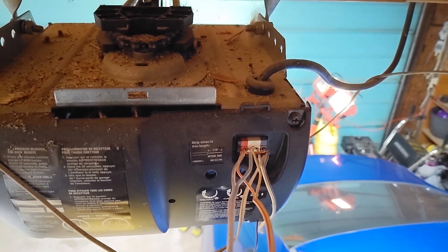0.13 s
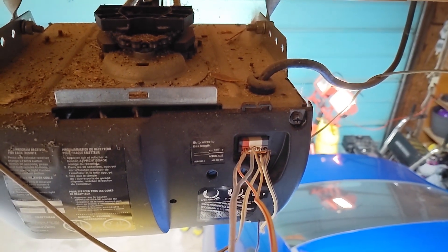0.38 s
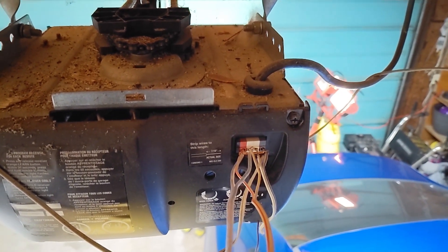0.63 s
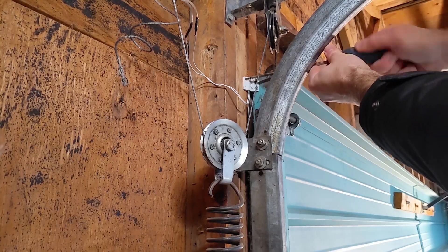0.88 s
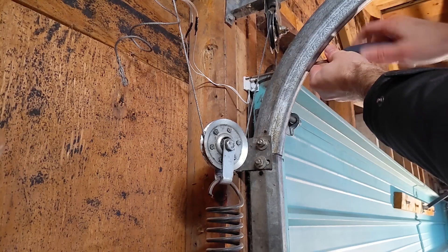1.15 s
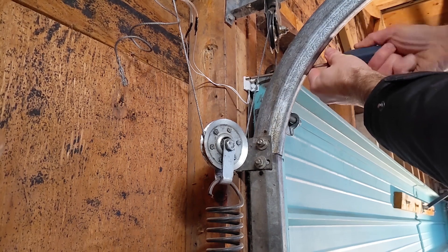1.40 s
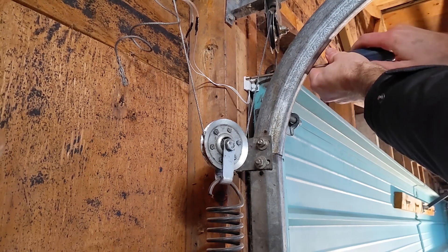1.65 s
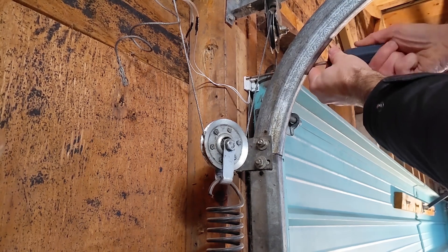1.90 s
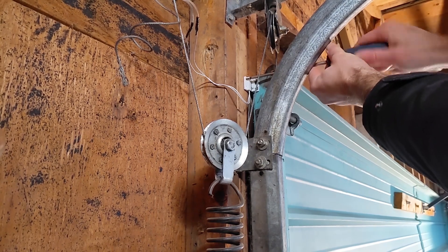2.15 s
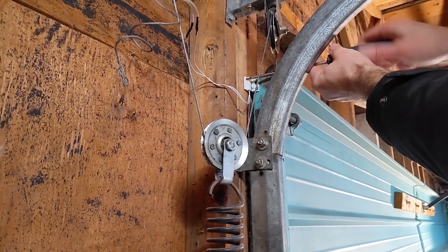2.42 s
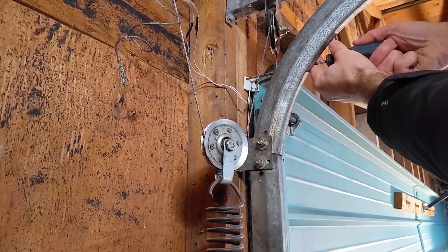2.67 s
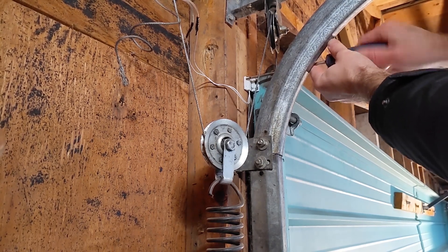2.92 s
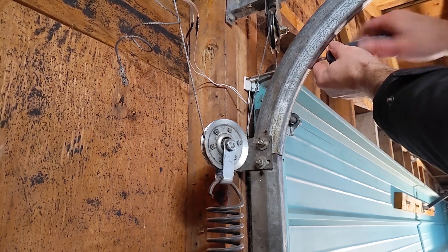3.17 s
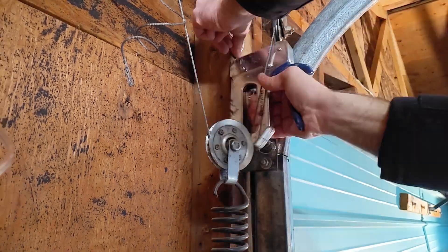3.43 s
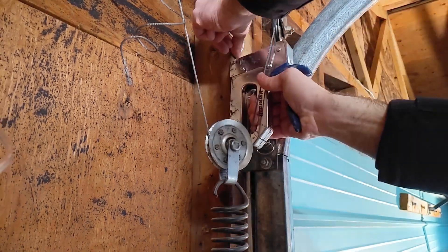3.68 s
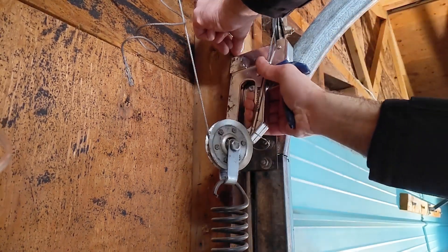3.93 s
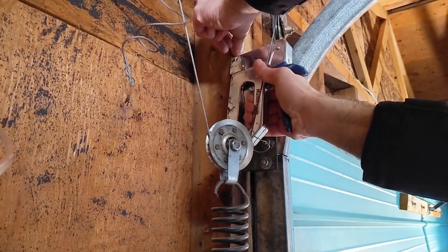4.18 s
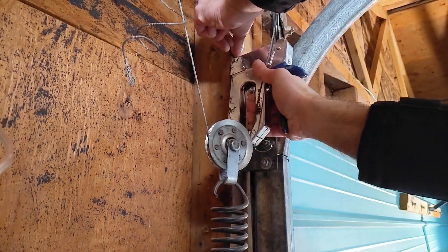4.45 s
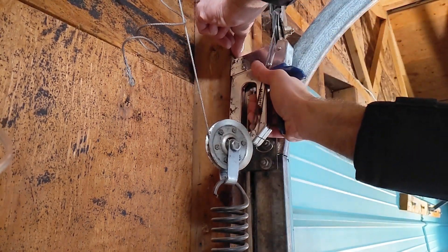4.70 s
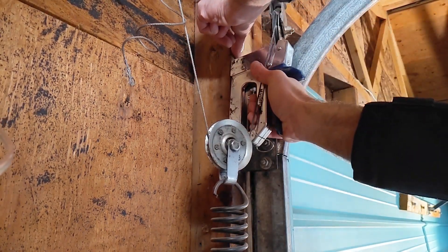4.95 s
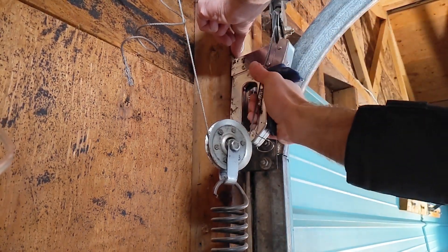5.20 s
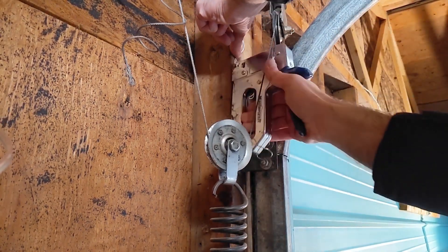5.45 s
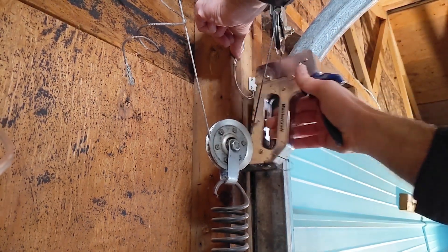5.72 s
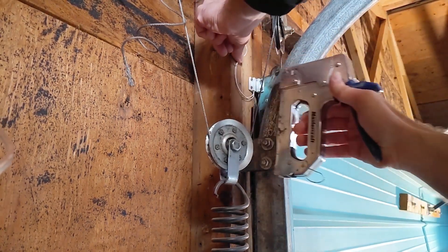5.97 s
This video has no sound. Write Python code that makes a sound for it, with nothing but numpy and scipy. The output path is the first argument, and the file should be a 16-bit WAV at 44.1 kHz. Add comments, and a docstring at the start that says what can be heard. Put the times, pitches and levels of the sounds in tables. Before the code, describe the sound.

A wooden garage, close stereo microphone, very quiet air. At 0 s an earlier bump dies quickly over faint low rumble; a small tick comes near 0.6. From 0.7 to 3.5 s hands turn a screwdriver: soft sleeve swishes about every fifth of a second, dull rubs, a click with a woody tap at 0.97, thin high squeaks around 1.4, another tick and tiny chirp near 1.8, with a faint outside drone beneath. At 3.4-3.5 light clicks and bumps mark the change. The staple gun rubs and taps the board around 3.9, clicks harder at 4.12, then rubs quietly. Squeezing gives a knock at 4.84 and steel clicks at 4.9 and 5.0. At 5.14 it fires: a loud, dry, bright crack with hissing tail and low wall boom. Boomy clatter follows at 5.4-5.6, heavy clacks at 5.59 and 5.7, then weaker knocks fading by 6 s.

```python
"""A steel staple gun in a wooden garage is set on a board, squeezed, fired and lifted off with clacks and knocks.
Before it, hands turn a screwdriver; the screw squeaks and sleeves rustle close to a two-port microphone.
Rattling contacts ring steel and board modes, and sparse reflections return from the room.
Shaped noise makes cloth, the shot's hissing treble tail, rubs, wall boom, a faint drone and air;
a wandering sine swings the frame."""
import sys
import numpy as np
from scipy import signal
from scipy.fft import rfft, irfft
from scipy.io import wavfile
from scipy.ndimage import uniform_filter1d

SR = 44100
rng = np.random.default_rng(int(sys.argv[2]) if len(sys.argv) > 2 else 0)


def pcm_store(signal):
    """Save signal as 16-bit PCM."""
    levels = np.round(np.clip(np.atleast_2d(signal), -1, 1) * 32767)
    wavfile.write(sys.argv[1], SR, levels.astype(np.int16).T)


def rack_gain(trim_db):
    """Turn a fader trim in dB into the linear factor to multiply a signal by."""
    fader = np.asarray(trim_db, float)
    return 10 ** (fader / 20)


N = 268701
RING = 4096  # samples a blow lasts

# Modes of the steel parts. Each row: pitch in Hz, relative level in dB, t60 in seconds.
STEEL = [(1335, -4, .03), (2000, -5, .03), (2330, -3, .05), (2900, -4, .03), (3500, -5, .03),
         (4400, -5, .02), (5500, -6, .015), (6510, -4, .015), (8350, -7, .012), (10080, -9, .012),
         (11700, -5, .012)]
# Likeness of left and right in diffuse sound. Each row: frequency in Hz, likeness from 0 to 1.
SAME = [(60, 0.89), (130, 0.94), (300, 0.45), (650, 0.11), (1400, 0.03), (15000, 0)]
# Cuts between three stretches of work. One row: times in seconds.
CUTS = (.717, 3.495)


def evened(x):
    """Scales a sound to rms 1."""
    return x / np.sqrt(np.mean(x ** 2) + 1e-20)


def read(points, hz):
    """Reads a table on a log-frequency axis."""
    f, value = np.transpose(points)
    return np.interp(np.log(hz + 1), np.log(f + 1), value)


def stretch(index):
    """1 during one stretch of work, 0 outside."""
    return 1. * (np.searchsorted(CUTS, np.arange(N) / SR) == index)


def swells(peaks, rise_db_s):
    """Gain from rows (peak s, dB, fade dB per s): straight rise and fade in dB, powers added."""
    t = np.arange(0, N + 64, 64) / SR
    power = 0
    for s, db, fade in peaks:
        drop_db = np.where(t < s, rise_db_s * (s - t), fade * (t - s))
        power = power + rack_gain(db - drop_db) ** 2
    return np.interp(np.arange(N) / SR, t, np.sqrt(power))


def fading_gain(start_db, fade_db_s):
    """Gain that falls steadily in dB from the first sample."""
    return rack_gain(start_db - fade_db_s * np.arange(N) / SR)


def slow_drift(size):
    """Smooth random drift of rms 1, from noise averaged twice over size samples."""
    once = uniform_filter1d(rng.standard_normal(N), size)
    return evened(uniform_filter1d(once, size))


def noise(points, patchy_db, size):
    """Stereo noise of a spectrum in dB per Hz, with drifting patches, alike in the bass; rms 1."""
    hz = np.fft.rfftfreq(size, 1 / SR)
    a, b, c, d, patches = rng.standard_normal((N * 4 // size + 5, len(hz), 5)).T
    patches = uniform_filter1d(patches, size // 64, axis=0)  # over frequency
    patches = evened(uniform_filter1d(patches, 8192 // size, axis=1))  # over time
    same = read(SAME, hz)[:, None]
    left, other = a + 1j * b, c + 1j * d
    z = np.array([left, same * left + np.sqrt(1 - same ** 2) * other])
    z *= rack_gain(read(points, hz)[:, None] + patchy_db * patches)
    return evened(signal.istft(z, nperseg=size, noverlap=size * 3 // 4)[1][:, :N])


def resonance(hz, width):
    """Response of one resonance of about unit gain on the bins of a blow; width in Hz."""
    back = np.exp(-2j * np.pi * np.arange(RING // 2 + 1) / RING)
    pole = np.exp((2j * np.pi * hz - np.pi * width) / SR)
    return (1 - abs(pole)) * (1 / (1 - pole * back) + 1 / (1 - np.conj(pole) * back))


def rattle(length):
    """Spectra of a short chatter of contacts, as the left and right ports hear it close by."""
    # Likeness of left and right in close sound. Each row: frequency in Hz, likeness from 0 to 1.
    near_same = [(100, .98), (400, 1), (1000, 0.46), (3000, 0), (15000, 0)]
    port_lag_s = 0.000197  # the left port hears the work a little earlier
    t, bins = np.arange(RING) / SR, np.fft.rfftfreq(RING, 1 / SR)
    uneven = rack_gain(2.0 * uniform_filter1d(rng.standard_normal(RING), 12))
    envelope = (1 - np.exp(-t / (0.071 * length))) ** 2 * np.exp(-t / length)
    left, other = rfft(rng.standard_normal((2, RING)) * uneven * envelope)
    same = read(near_same, bins)
    right = same * left + np.sqrt(1 - same ** 2) * other
    return left, right * np.exp(-2j * np.pi * bins * port_lag_s)


def struck_colour(hz, treble_db, modes, ring_db, edge_hz, top_hz, q):
    """Colour of a blow: its main ring, the object's modes and a bright crack."""
    bins = np.fft.rfftfreq(RING, 1 / SR)
    main = resonance(hz, hz / q) ** 2
    rings = 0
    for f, mode_db, t60 in modes:
        spot_db = 2.5 * rng.standard_normal()  # the spot struck favours some modes
        # modes near the main ring are struck hardest
        gain = rack_gain(mode_db - 11.5 * abs(np.log2(f / hz)) + spot_db)
        rings = rings + gain * resonance(f, np.log(1000) / np.pi / t60) * np.sqrt(t60)
    # a low top_hz dulls the crack, as soft wood does
    crack = (1j * bins / (edge_hz + 1j * bins)) ** 3 / (1 + 1j * bins / top_hz) ** 2
    parts = ((main, 0), (rings, ring_db), (crack, treble_db + 4.5))
    return sum(rack_gain(db) * part / np.linalg.norm(part) for part, db in parts)


def struck(rows, modes, ring_db, edge_hz, top_hz, q, left_db):
    """All blows of one kind: left, right, and as sent into the room with a smooth colour."""
    out = np.zeros((3, N + RING))
    for s, db, hz, treble_db, length, room_db in rows:
        length = max(length, .0005)
        left, right = rattle(length)
        colour = struck_colour(hz, treble_db, modes, ring_db, edge_hz, top_hz, q)
        # the room hears the blow from all sides, so no chatter roughens its colour
        sound = np.array([evened(irfft(colour * drive)) for drive in (left, right, 1)])
        feeds_db = np.array([[left_db / 2], [-left_db / 2], [room_db]])
        # energy = peak squared x rattle length, with the rms 8 dB under the nominal peak
        sound *= rack_gain(db - 8.0 + feeds_db) * np.sqrt(length * SR / RING)
        at = round(s * SR)
        out[:, at:at + RING] += sound
    return out[:, :N]


def rattling(rows, rattle_s):
    """Gives each blow its rattle length, rattle_s at -30 dB: harder blows chatter longer."""
    doubling_db = 70  # a blow this much harder chatters twice as long
    return [(s, db, hz, treble_db, rattle_s * 2 ** ((db + 30) / doubling_db), room_db)
            for s, db, hz, treble_db, room_db in rows]


def staple_shot():
    """The spring drives the staple home: a burst of short, bright steel blows."""
    # Each row: start in seconds, nominal peak in dB, main ring in Hz,
    # relative treble in dB, room feed in dB.
    shot_blows = [(5.1375, -13, 3000, 1, -11), (5.1408, 1.5, 5050, -6, 0), (5.1445, -9, 3000, 4.5, -1),
                  (5.149, -11, 4600, -6, -4), (5.156, -18, 3500, -7, -8)]
    return struck(rattling(shot_blows, 0.0018), STEEL,
                  ring_db=-16, edge_hz=4700, top_hz=29800, q=0.71, left_db=0.0)


def steel_clicks():
    """Steel parts click as short contacts ring the steel modes."""
    # Each row: start in seconds, nominal peak in dB, main ring in Hz,
    # relative treble in dB, room feed in dB.
    click_blows = [(.587, -52, 2680, -14, -8), (.972, -31, 2880, -11, -7.5), (.979, -31.5, 2300, -18, -16),
                   (1.057, -41, 9300, 17, -13), (1.846, -32.5, 2140, 21, -7), (2.218, -48, 2150, -13, -3),
                   (2.318, -46.5, 1900, -15, -20), (2.624, -41.5, 2430, 0, -3),
                   (3.09, -49, 1980, -21, -0.5), (3.357, -38, 7100, 8, -9), (3.396, -33.5, 2060, -1, -9),
                   (3.408, -48, 3000, 3, 5), (3.419, -51, 2270, 0, 3), (3.497, -25.5, 8800, -10, -5),
                   (3.499, -25, 2560, -1.5, -6), (3.742, -53, 5900, -11, -25), (3.765, -55, 5000, -10, -17),
                   (3.861, -46, 2120, -20, -8), (3.89, -44.5, 4450, -1, -14), (3.921, -39.5, 4700, 7, -18),
                   (3.93, -37.5, 1950, -20, -7), (3.998, -54, 4500, -3, 1), (4.124, -21, 6400, 5.5, -6.5),
                   (4.135, -25.5, 1760, -7, -7), (4.15, -36, 1830, -15, -19), (4.697, -38, 2190, 5, -6),
                   (4.907, -16.5, 6730, -2, -15), (5.008, -10, 4500, -20, -12.5),
                   (5.372, -27.5, 10100, -14, -10), (5.41, -39, 12000, -2, -18),
                   (5.455, -40, 12000, 2, -15), (5.477, -32.5, 2940, -4, -4), (5.488, -29.5, 9500, -2, -19),
                   (5.504, -23.5, 7360, -7, -12), (5.512, -21.5, 2100, -20, -1.5),
                   (5.53, -26.5, 2300, -18, -7), (5.552, -22, 2240, -27, -15),
                   (5.588, -11.5, 2710, -5, -13.5), (5.592, -2.5, 6540, -2, -20.5),
                   (5.703, -15.5, 4630, -28, -5), (5.705, -7, 2100, -47, -4.5), (5.712, -13, 3600, -30, -8),
                   (5.72, -11, 2220, -43, -4.5), (5.735, -14.5, 1900, -35, -6), (5.82, -22, 3500, -35, -5),
                   (5.825, -23, 2190, -30, -10), (6.045, -44.5, 4120, -6, -1)]
    return struck(rattling(click_blows, 0.0043), STEEL,
                  ring_db=-5.5, edge_hz=5200, top_hz=30500, q=1.3, left_db=7.0)


def wood_knocks():
    """The tool, then the gun's nose and body, bump the board and ring its modes."""
    # Each row: start in seconds, nominal peak in dB, main ring in Hz,
    # relative treble in dB, room feed in dB.
    knock_blows = [(.972, -29.5, 1450, -3, -9), (.984, -35.5, 642, -13, -9), (1.846, -33.5, 860, -6, -12),
                   (2.63, -47.5, 643, -4, 1), (2.96, -52.5, 790, -14, -2), (3.405, -36, 640, -0.5, -6),
                   (3.497, -27.5, 1220, -12, -12.5), (3.506, -34.5, 290, 2.5, -22),
                   (3.824, -45.5, 1080, -28, -1.5), (3.921, -25.5, 960, -53, -9.5),
                   (4.096, -34.5, 1020, -33, -6), (4.124, -26.5, 1010, -34, -9.5),
                   (4.817, -40, 1290, -21, -12), (4.827, -38.5, 1150, -41, 7.5),
                   (4.843, -17.5, 1050, -50, -24), (4.862, -23.5, 830, -44, -17),
                   (4.877, -25, 620, -49, -4.5), (5.504, -14, 817, -34, -13.5), (5.528, -15, 386, -42, -17),
                   (5.548, -21.5, 465, -31, -13), (5.589, -15.5, 1310, -24, -23),
                   (5.702, -5.5, 742, -38, -10), (5.715, -5, 1360, -14, -8.5),
                   (5.728, -17.5, 386, -37.5, -4.5), (5.74, -16, 567, -38, -4), (5.778, -26, 1330, -33, -3)]
    # Modes of the board. Each row: pitch in Hz, relative level in dB, t60 in seconds.
    board = [(165, -4, .1), (300, -6, .08), (460, -6, .08), (550, -3, .09), (790, 0, .08), (1000, -4, .07),
             (1090, -3, .07), (1220, -3, .07), (1310, -4, .07), (1385, -4, .07), (1640, -5, .07),
             (2330, -5, .09)]
    return struck(rattling(knock_blows, .011), board,
                  ring_db=1.0, edge_hz=490, top_hz=3500, q=4.2, left_db=4.0)


def screw_squeaks():
    """The screw squeaks and chirps as it turns: rattles through a narrow main ring."""
    # Each row: start in seconds, nominal peak in dB, main ring in Hz, length in seconds.
    squeak_rows = [(1.392, -44.5, 5180, 0.035), (1.425, -46, 5700, 0.011), (1.444, -49, 2320, 0.0064),
                   (1.757, -47, 2290, 0.006)]
    treble_db, room_db = -3, -18
    chirps = [(s, db, hz, treble_db, length, room_db) for s, db, hz, length in squeak_rows]
    return struck(chirps, STEEL, ring_db=-25, edge_hz=9900, top_hz=30000, q=14, left_db=10.0)


def garage(x, longer):
    """Sparse reflections of random sign, each band dying at its own speed."""
    # Each row: frequency in Hz, t60 in seconds before the factor longer.
    decay_times = [(125, 1), (300, 1), (700, 0.92), (1800, 0.75), (5000, 0.45), (13000, 0.28)]
    taps = np.zeros((2, SR))
    at = np.arange(200, SR - 12, 12) + rng.integers(0, 12, (2, (SR - 201) // 12))
    np.put_along_axis(taps, at, rng.choice([-1., 1.], at.shape), 1)
    hz, t, z = signal.stft(taps, SR, nperseg=256)
    same = read(SAME, hz)[:, None]
    z[1] = same * z[0] + np.sqrt(1 - same ** 2) * z[1]
    t60 = longer * read(decay_times, hz)[:, None]
    tail = signal.istft(z * rack_gain(-60 * t / t60), SR, nperseg=256)[1]
    return signal.fftconvolve(x[None], tail / np.linalg.norm(tail[0]), axes=1)[:, :N]


def bright_swishes():
    """Grainy bright noise: sleeves and skin brushing, and the hissing treble tail after the shot."""
    # Each row: middle in seconds, level in dB, half length in seconds.
    swish_rows = [(0.14, -67, 0.15), (0.703, -56.5, 0.08), (0.952, -62, 0.062), (1.146, -64, 0.033),
                  (1.408, -61.5, 0.061), (1.585, -65.5, 0.038), (1.82, -62, 0.05), (2.004, -64, 0.042),
                  (2.278, -62.5, 0.056), (2.45, -63, 0.039), (2.655, -60, 0.039), (2.823, -62.5, 0.054),
                  (3.031, -59.5, 0.046), (3.185, -61.5, 0.045), (3.384, -55, 0.046), (3.553, -79, 0.062),
                  (3.894, -68, 0.028), (4.676, -70.5, 0.097), (4.96, -68, 0.22), (5.21, -43, 0.09),
                  (5.65, -48, 0.052), (6.003, -66.5, 0.14)]
    # One row: steady brushing level in dB in each stretch of work.
    brush_levels = (-77.5, -68.5, -69.5)
    # Each row: frequency in Hz, level in dB per Hz.
    swish_tone = [(900, -2.5), (1700, -2.5), (2300, 2), (3000, 2.5), (5500, -1), (7200, 3), (10500, 0),
                  (12000, 4), (15600, 3.5), (17000, -35)]
    t = np.arange(0, N, 64) / SR
    swish = 0
    for s, db, half in swish_rows:
        same_stretch = np.searchsorted(CUTS, t) == np.searchsorted(CUTS, s)
        swish = swish + rack_gain(db) * np.exp(-abs((t - s) / half) ** 3) * same_stretch
    swish = np.interp(np.arange(N) / SR, t, swish)
    brushing = sum(rack_gain(db) * stretch(index=k) for k, db in enumerate(brush_levels))
    grain = rack_gain(1.3 * evened(uniform_filter1d(rng.standard_normal(N), 200)))
    return noise(swish_tone, patchy_db=1.85, size=512) * grain * (swish + brushing)


def dull_rubs():
    """The tool rubs on the bracket, then the gun on the board: swells of duller noise."""
    # Each row: peak in seconds, level in dB, fade in dB per second.
    rub_swells = [(.86, -67, 86), (.97, -60, 86), (1.31, -68.5, 56), (1.47, -64, 192), (1.855, -60.5, 184),
                  (2.3, -61.5, 121), (2.68, -63, 103), (2.96, -64, 200), (3.17, -66, 116),
                  (3.41, -50.5, 300), (3.83, -67, 100), (3.94, -47.5, 348), (4.084, -54, 77),
                  (4.4, -61, 24), (4.69, -55.5, 63)]
    # Each row: frequency in Hz, level in dB per Hz.
    rub_tone = [(350, -30), (520, -12), (650, -12), (790, 0), (940, -12), (1080, -8), (1500, -18),
                (2280, -10), (2900, -22), (4000, -40)]
    return swells(rub_swells, rise_db_s=201) * noise(rub_tone, patchy_db=2.0, size=1024)


def wall_boom():
    """Pushes on the board shake the building: a swinging frame pitch in lumpy low noise."""
    # Each row: peak in seconds, boom in dB, upper boom in dB, fade in dB per second;
    # both levels are before the stereo narrowing.
    pushes = [(3.504, -36, -44, 212), (3.529, -38, -64, 208), (3.61, -39.5, -73, 229), (3.7, -47, -77, 47),
              (3.938, -39.5, -50, 154), (4.0, -42.5, -63, 57), (4.15, -44, -53, 54), (4.26, -50, -60, 32),
              (4.48, -56, -54, 77), (4.839, -53, -42, 89), (5.03, -68, -49, 64), (5.168, -25.5, -33, 250),
              (5.288, -23, -36.5, 184), (5.408, -25.5, -24, 700), (5.479, -24, -33, 300),
              (5.508, -40, -22, 130.5), (5.54, -22.5, -36, 402.5), (5.63, -28.5, -35.5, 206),
              (5.708, -37, -16.5, 177), (5.74, -25, -28, 170), (5.83, -27.5, -30.5, 48),
              (6.0, -44, -38.5, 100)]
    # Spectra of the low and the upper boom. Each row: frequency in Hz, level in dB per Hz.
    low_tone, upper_tone = [(15, -59), (25, -25), (52, -20.5), (70, 1.5), (86, -6), (140, -14), (180, -37),
                            (310, -120)], [(71, -31), (120, -5), (193, -5), (253, -16.5), (345, -10),
                                              (403, -19), (452, -8), (500, -18), (650, -17.5), (1100, -120)]
    frame_hz, wander_hz = 71.6, 7  # one loose pitch and the rms of its wander
    frame_share = .85  # amplitude share of the swing in a push
    lean_db, lean_upper_db = -52, -58  # steady shaking while the gun rests on the board
    width = .55  # share of the left-right difference kept
    s, low_db, upper_db, fade = np.transpose(pushes)
    pitch = frame_hz + wander_hz * slow_drift(2000)
    swing = np.sqrt(2) * np.sin(2 * np.pi * np.cumsum(pitch) / SR)
    push = swells(zip(s, low_db, fade), rise_db_s=457)
    lump_gain = np.hypot(push * np.sqrt(1 - frame_share ** 2), rack_gain(lean_db))
    low = push * frame_share * swing + lump_gain * noise(low_tone, patchy_db=1.0, size=2048)
    # the upper boom answers a push at once
    upper_gain = np.hypot(swells(zip(s, upper_db, fade), rise_db_s=1400), rack_gain(lean_upper_db))
    upper = upper_gain * noise(upper_tone, patchy_db=1.0, size=2048)
    shaking = (low + upper) * stretch(index=2)
    middle = shaking.mean(axis=0)
    return middle + width * (shaking - middle)


def early_rumble():
    """Wall rumble in the first stretch: steady low noise, plus a bump that dies."""
    # Each row: frequency in Hz, level in dB per Hz.
    early_tone = [(18, -46), (30, -16), (65, 4), (102, -4.5), (269, -3), (580, -14.5), (767, -23),
                  (805, -34), (1190, -23), (1500, -29), (1950, -60), (3300, -120)]
    gain = np.hypot(fading_gain(-44, fade_db_s=200), rack_gain(-62.5))
    return gain * noise(early_tone, patchy_db=1.0, size=2048) * stretch(index=0)


def outside_drone():
    """A faint low drone from outside in the second stretch: noise of slowly wavering level."""
    # Each row: frequency in Hz, level in dB per Hz.
    drone_tone = [(18, -45), (30, 11), (59, -4.5), (108, 5.5), (140, -11), (195, 0), (228, -12), (371, -16),
                  (411, -23), (450, -28), (580, -59), (990, -120)]
    gain = rack_gain(-69.5 + 2.5 * slow_drift(2500))
    return gain * noise(drone_tone, patchy_db=0.0, size=2048) * stretch(index=1)


def fading_bump():
    """An earlier bump dies in the room: noise falling steadily in dB."""
    # Each row: frequency in Hz, level in dB per Hz.
    fading_tone = [(180, -35), (300, -21), (410, -20), (553, -0.5), (790, -5.5), (1610, -22), (2330, -19.5),
                   (2540, -32), (3320, -22), (4680, -31), (7070, -39), (9000, -35), (11700, -61),
                   (19800, -120)]
    return fading_gain(-42.5, fade_db_s=119) * noise(fading_tone, patchy_db=1.0, size=512)


def room_air():
    """Still room air: steady, very quiet noise."""
    # Each row: frequency in Hz, level in dB per Hz.
    air_tone = [(180, -11), (300, -19), (584, -5.5), (762, -6.5), (1100, -13), (1390, -8), (1610, -17.5),
                (4230, -15), (4590, -16), (16000, -30)]
    return rack_gain(-71.5) * noise(air_tone, patchy_db=0.5, size=1024)


def scene():
    """Gun, board and hands close by, the garage around them, then boom and air."""
    shot = staple_shot()
    hands = steel_clicks() + wood_knocks() + screw_squeaks()
    shot_tail = garage(shot[2], longer=1.63)  # the shot's tail dies more slowly
    room = garage(hands[2], longer=0.88) * rack_gain([[1.2], [-1.2]])  # left, right in dB
    swishes = (bright_swishes() + dull_rubs()) * rack_gain([[1.5], [-1.5]])
    boom = (wall_boom() + early_rumble() + outside_drone()) * rack_gain([[.9], [-.9]])
    return shot[:2] + hands[:2] + shot_tail + room + swishes + boom + fading_bump() + room_air()


def top_cut(x):
    """Nothing passes above the cut-off."""
    return signal.sosfilt(signal.butter(12, 16820, fs=SR, output="sos"), x)


def record(dry):
    """Microphone bass cut, a soft ceiling and a band limit."""
    bass_cut_hz, edge_hz = 57.7, 15900
    bass_cut = signal.butter(4, bass_cut_hz, "high", fs=SR, output="sos")
    thin = signal.sosfilt(bass_cut, dry)
    band_limit = signal.firwin(255, edge_hz, window=("kaiser", 8), fs=SR)
    limited = signal.oaconvolve(np.tanh(thin), band_limit[None], "same")
    return top_cut(limited)


dry = scene()
out = record(dry)
pcm_store(out)
```